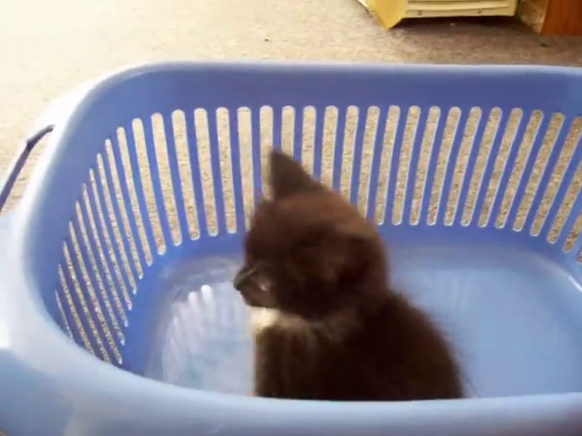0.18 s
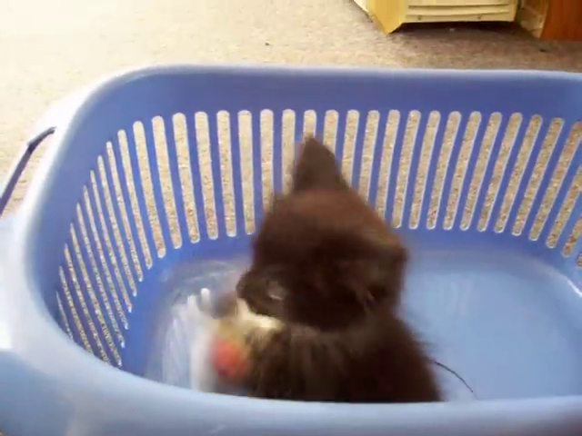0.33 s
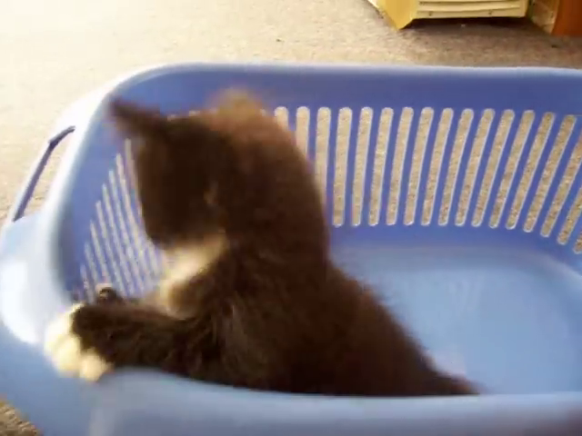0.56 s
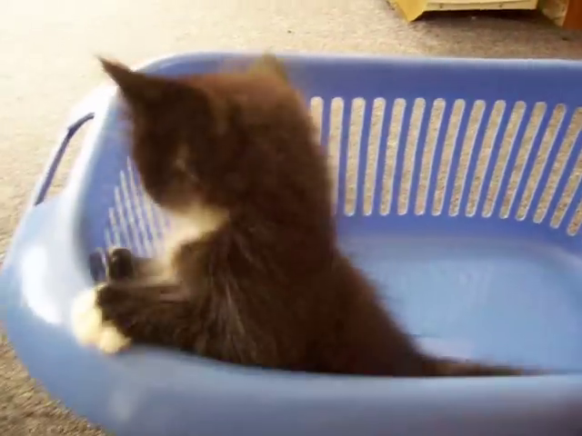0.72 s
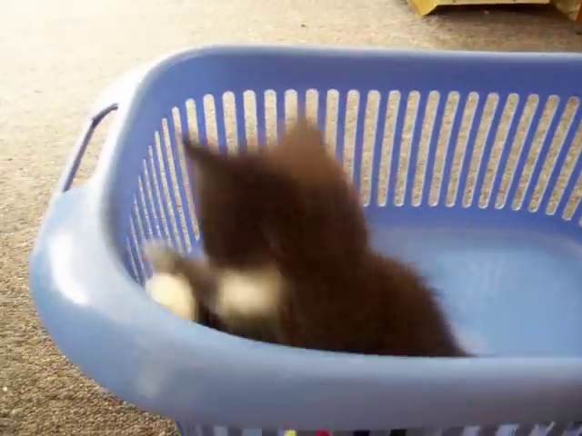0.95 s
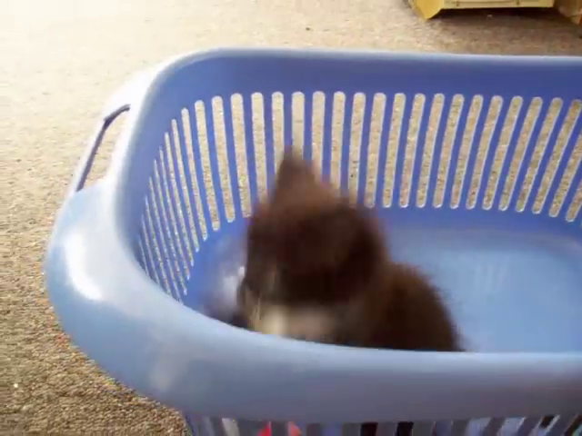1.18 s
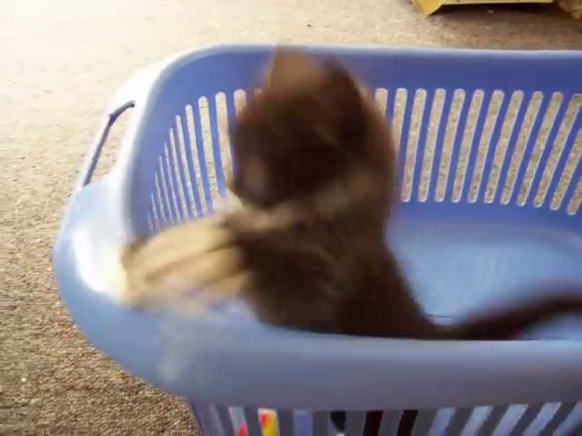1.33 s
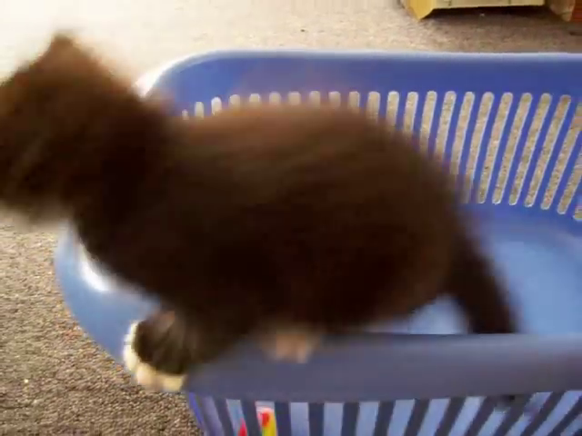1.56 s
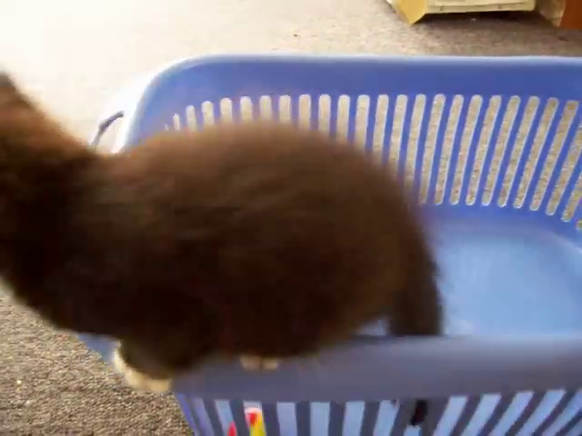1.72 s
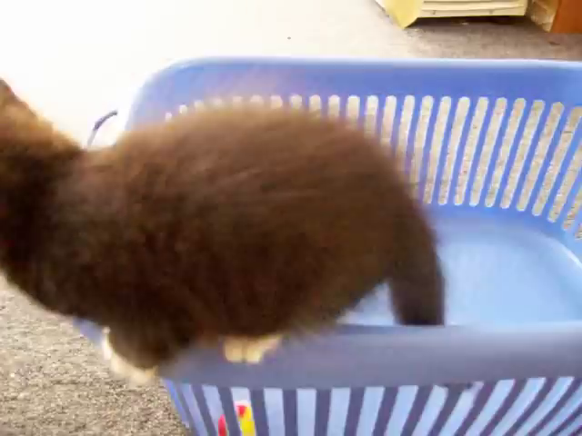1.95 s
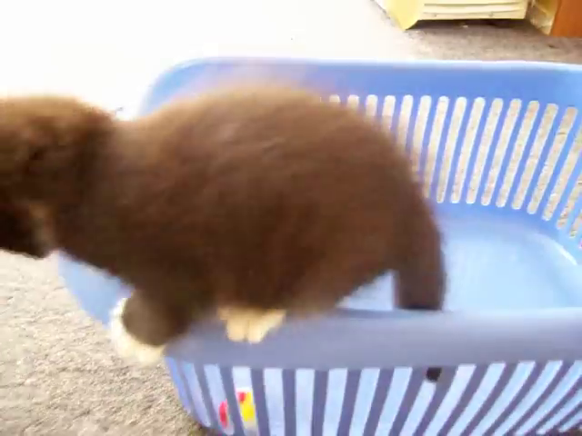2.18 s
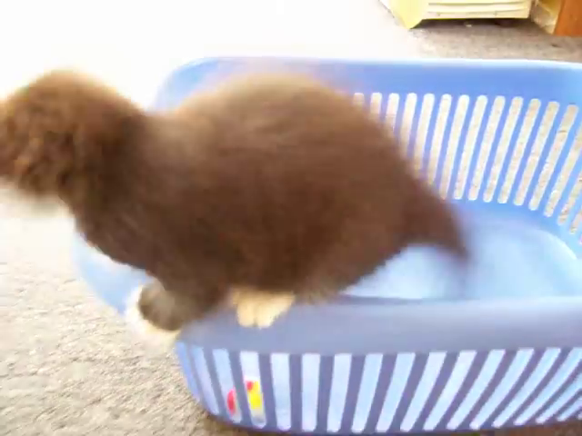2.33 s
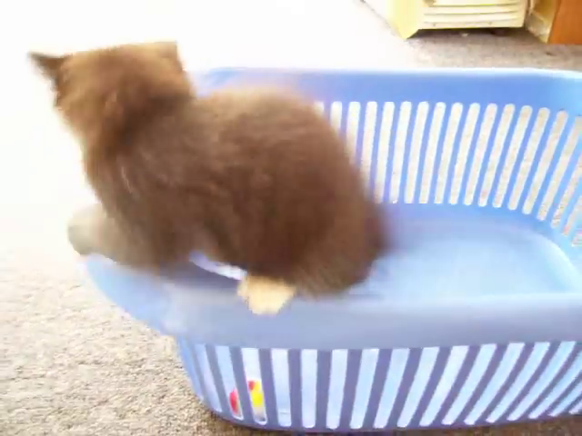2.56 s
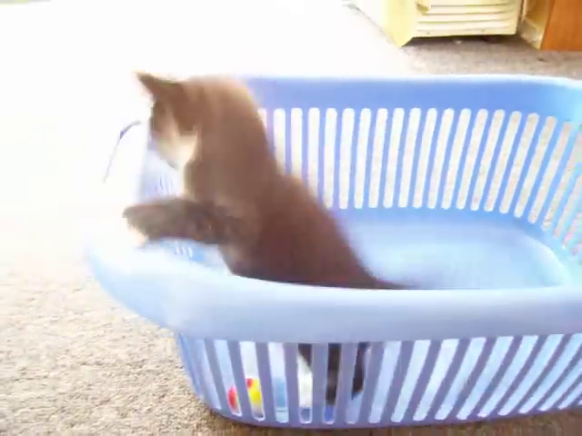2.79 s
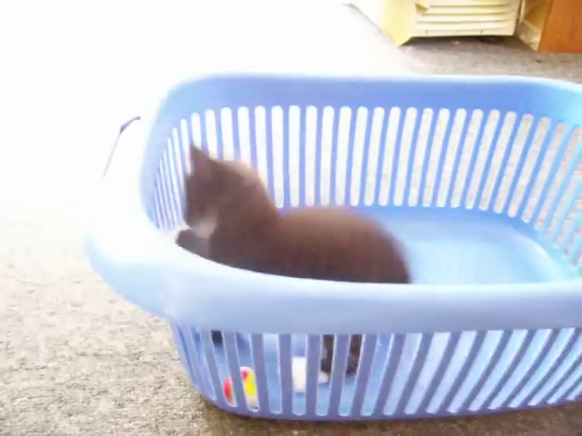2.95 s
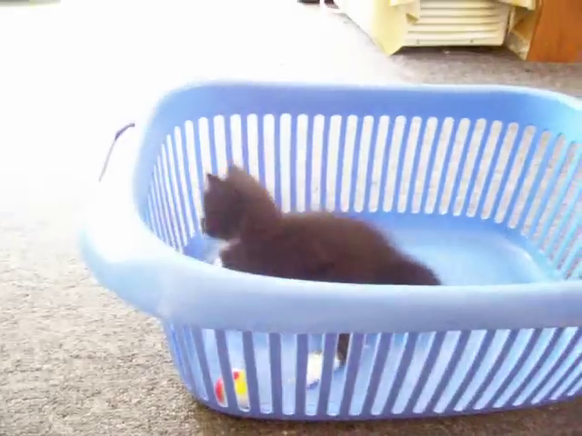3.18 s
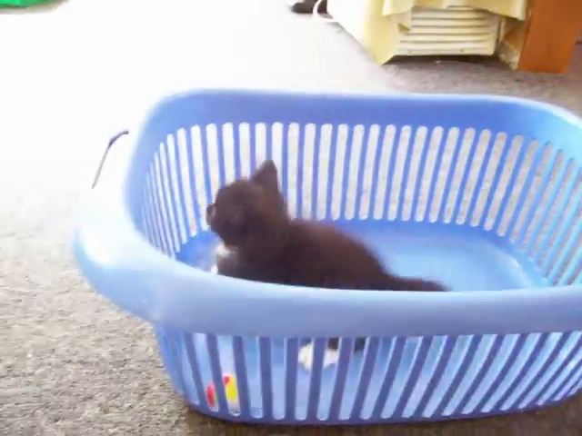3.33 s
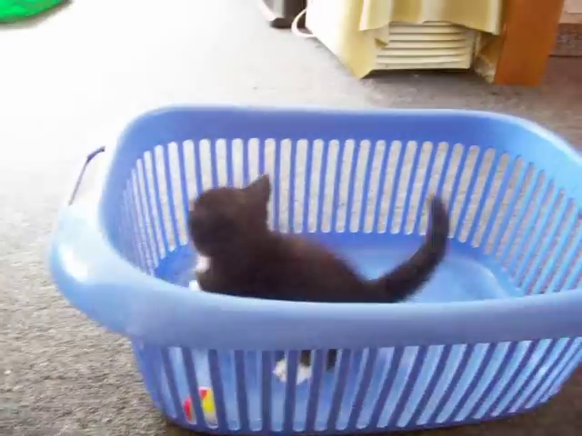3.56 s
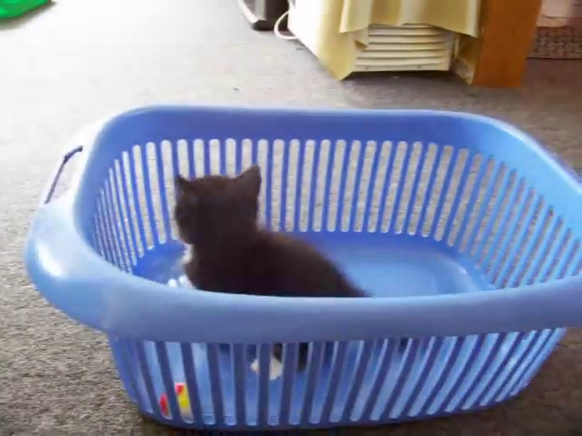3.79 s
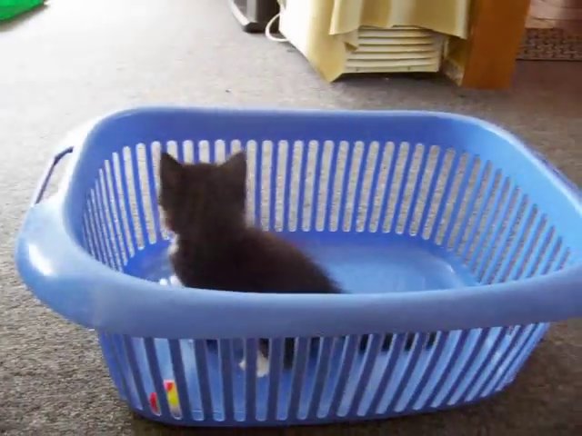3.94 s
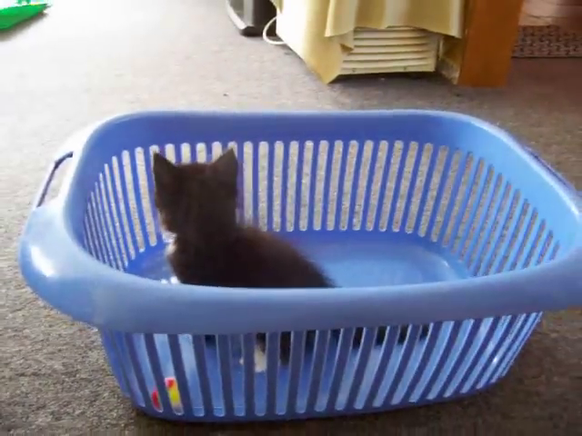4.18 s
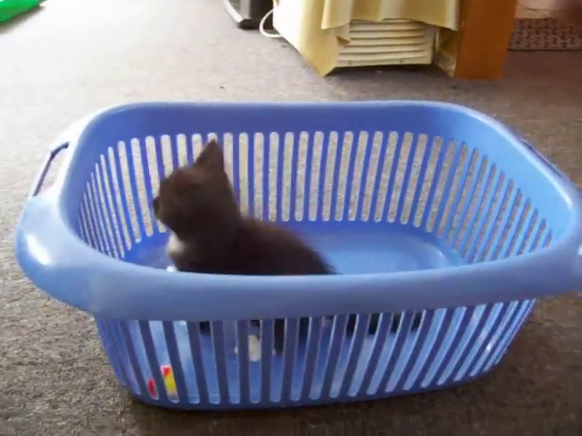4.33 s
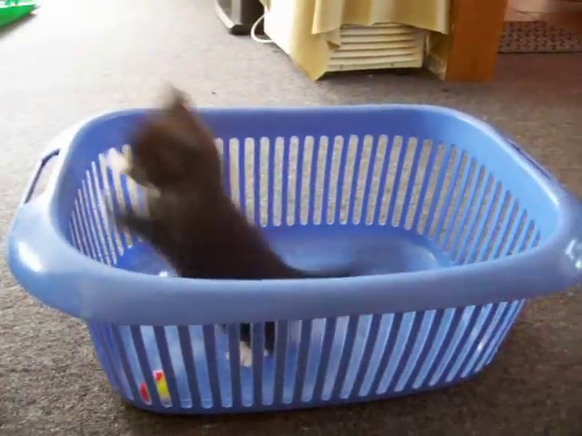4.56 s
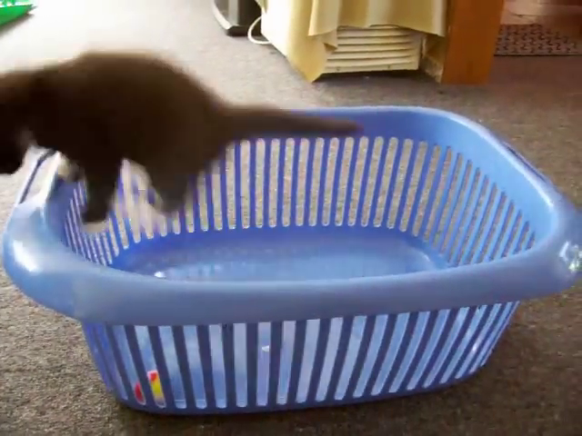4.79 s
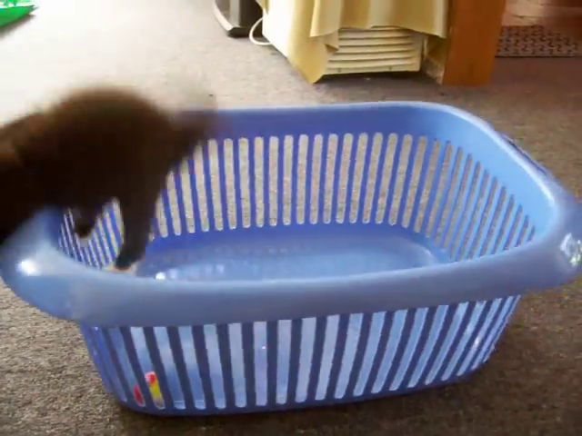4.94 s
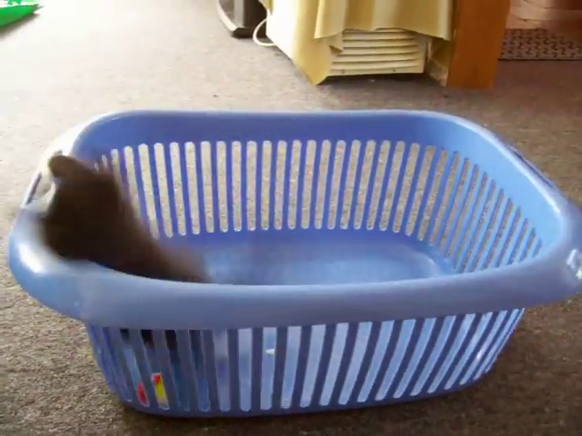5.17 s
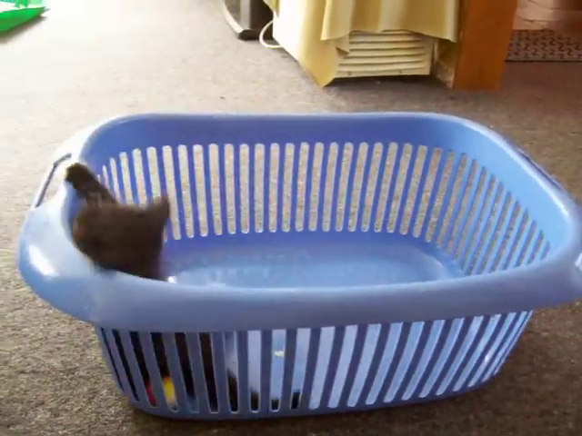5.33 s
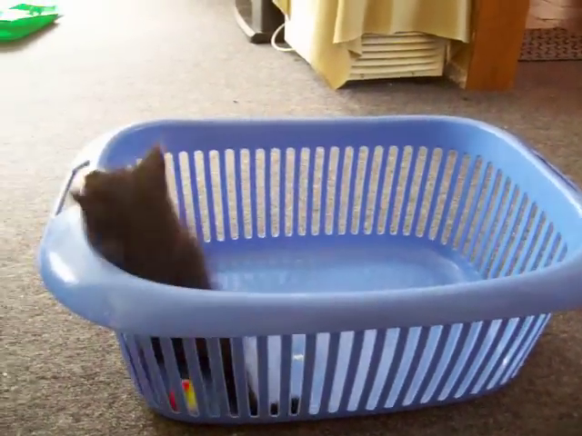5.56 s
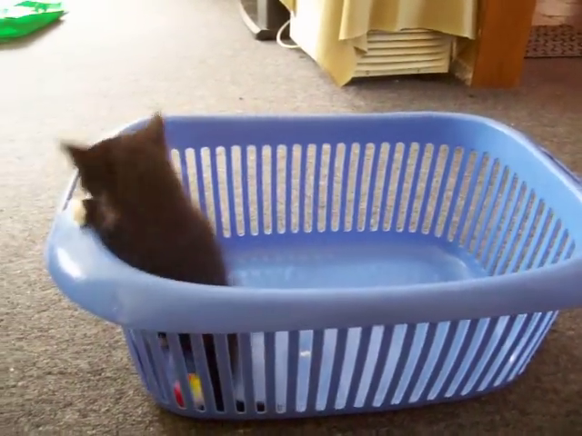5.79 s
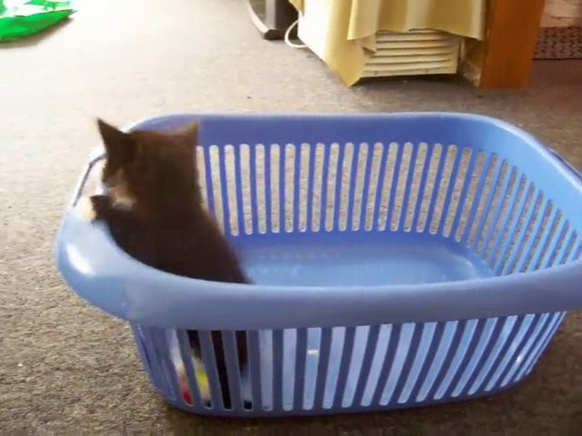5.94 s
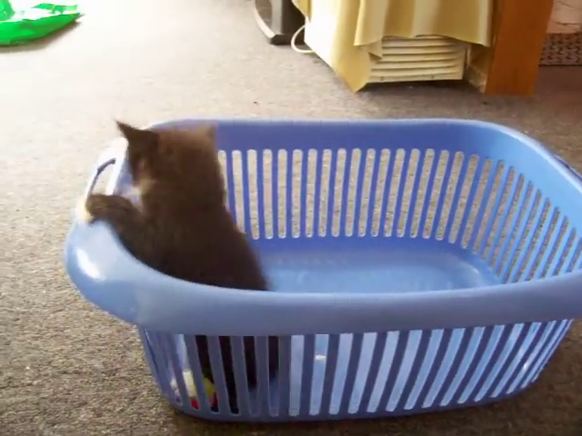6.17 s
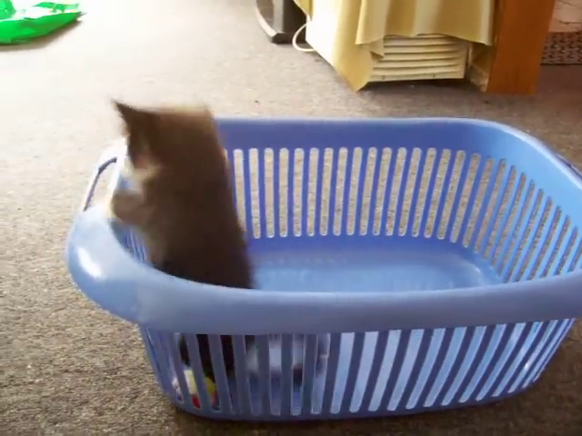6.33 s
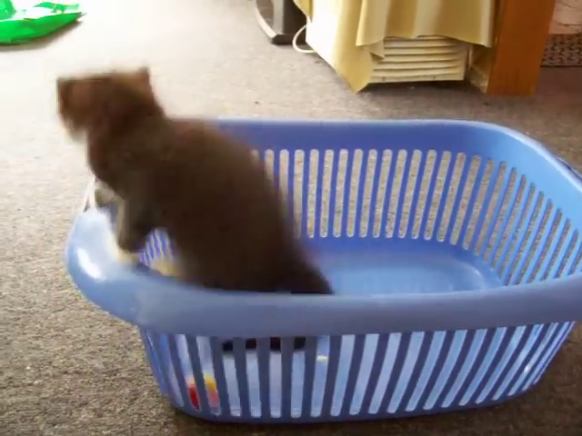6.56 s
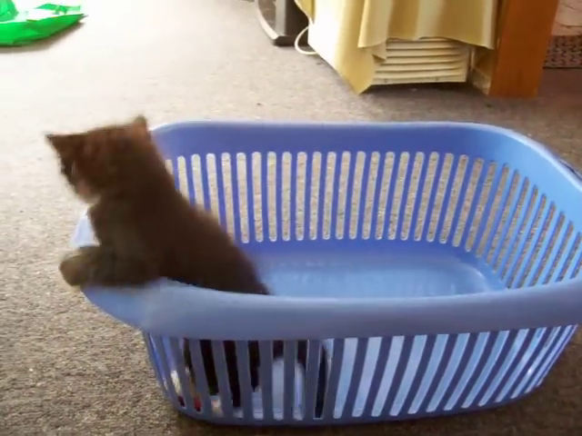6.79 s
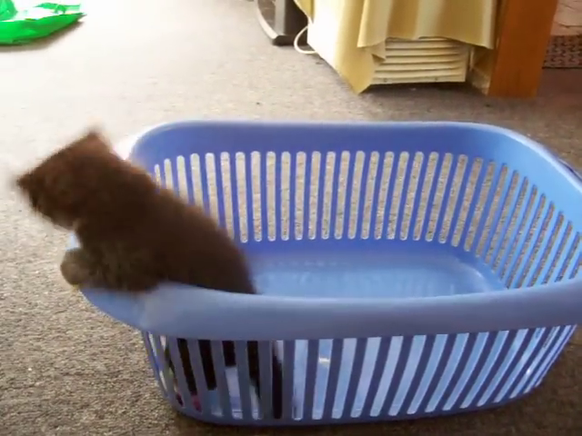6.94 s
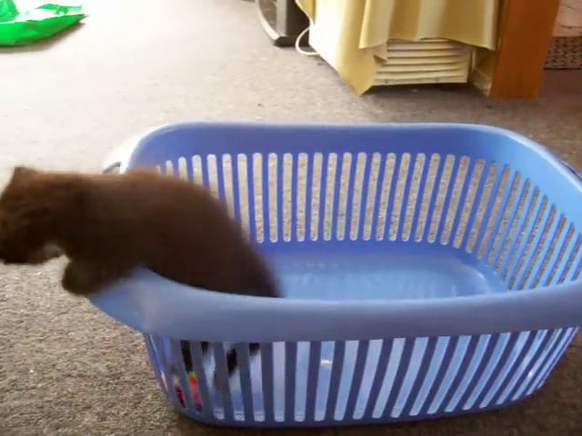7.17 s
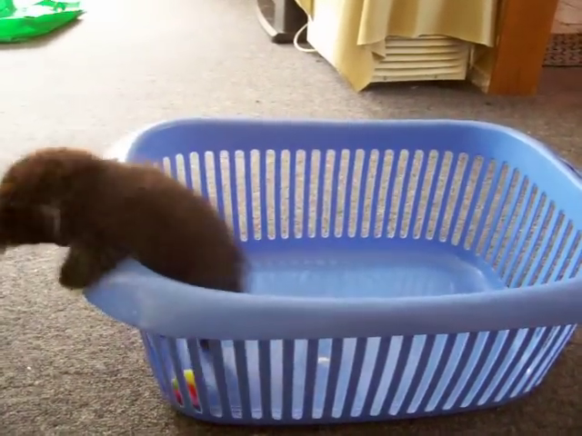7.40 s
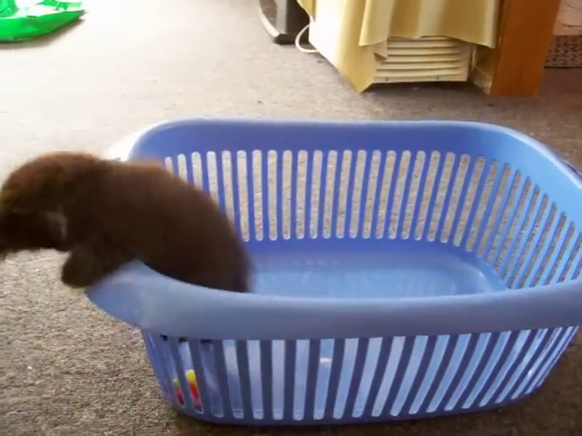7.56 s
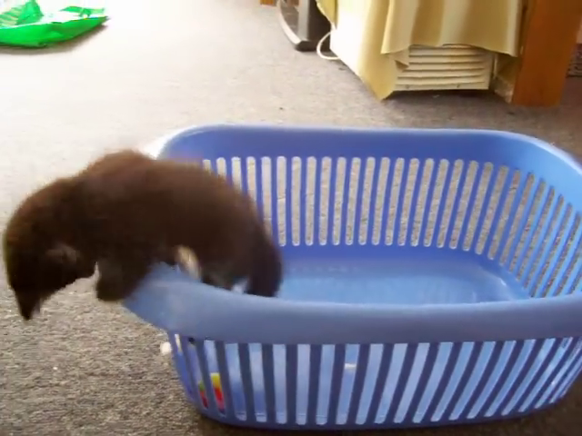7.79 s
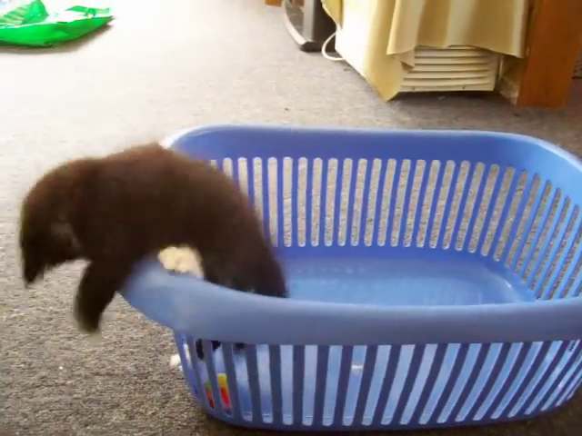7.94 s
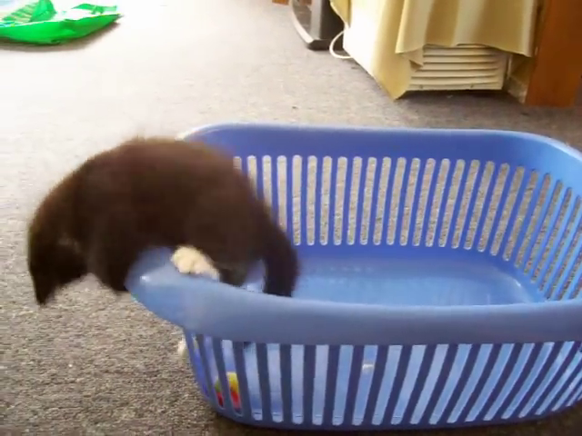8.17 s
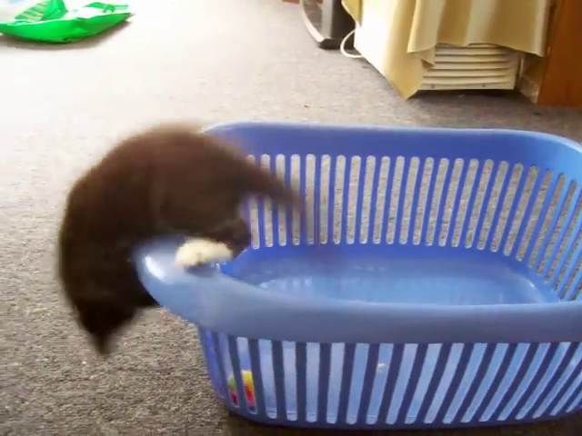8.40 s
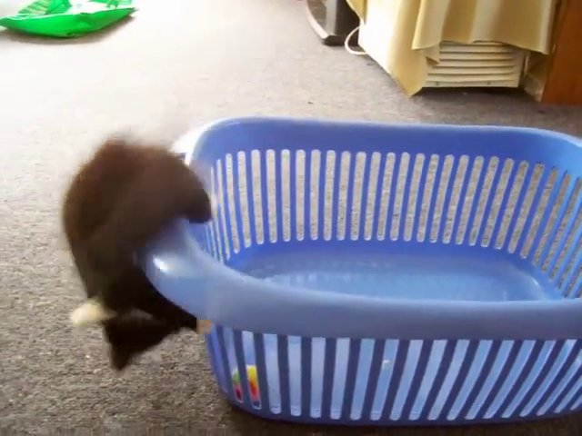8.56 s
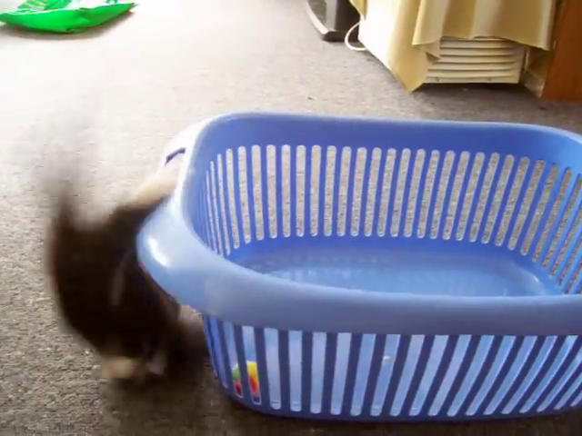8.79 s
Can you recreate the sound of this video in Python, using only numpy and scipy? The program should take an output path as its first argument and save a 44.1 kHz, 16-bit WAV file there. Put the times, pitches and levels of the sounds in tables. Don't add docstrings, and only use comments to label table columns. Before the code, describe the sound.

Small claws click, scrape and skid on a slatted plastic basket in bursts, with hollow thumps, over quiet room hum and thin camera whine.

```python
import sys
import numpy as np
from scipy import signal
from scipy.fft import rfft, irfft, next_fast_len
from scipy.io import wavfile
from scipy.ndimage import uniform_filter1d, map_coordinates

SR = 44100
rng = np.random.default_rng(int(sys.argv[2]) if len(sys.argv) > 2 else 0)


def undo_db(level):
    steps = np.asarray(level, float) / 20
    return 10 ** steps


def waveform_to_disk(signal):
    frames = np.transpose(np.atleast_2d(signal))
    scaled = np.clip(frames, -1, 1) * 32767
    samples = np.round(scaled).astype(np.int16)
    wavfile.write(sys.argv[1], SR, samples)


N = 388962

# (time [s], claw pull [dB], weight on the basket [dB])
DRAG_BOUTS = [
    [(0.0, -46.5, -41), (0.29, -65, -49.5), (1.02, -59, -45), (1.12, -44.5, -47), (1.4, -65.5, -45),
     (1.62, -48.5, -40.5), (2.1, -70, -57.5)],
    [(2.6, -61, -49.5), (2.69, -60, -46), (2.73, -45, -42), (2.95, -45, -41), (3.05, -56, -44),
     (3.16, -49, -44), (3.3, -62, -54)],
    [(4.7, -66, -48), (4.9, -56, -44), (5.214, -43, -34), (5.295, -56, -40), (5.36, -46, -40),
     (5.52, -57, -48), (5.7, -74, -55)],
    [(6.05, -57.5, -50), (6.53, -52.5, -49), (6.61, -44.5, -57), (7.01, -56.5, -45.5), (7.52, -45, -43),
     (8.1, -59.5, -47.5), (8.38, -51, -53), (8.7, -41, -42), (8.82, -47, -22)],
]
# (frequency [Hz], width [Hz], level [dB])
SLAT_MODES = [(2000, 680, -1.5), (2500, 1200, 1.5), (2970, 575, -2), (3180, 470, -13), (1660, 590, -18.5)]
# (frequency [Hz], width [Hz], level [dB])
EDGE_MODES = [(3980, 1600, -1), (5364, 1640, 5.5), (5760, 1780, 7), (7270, 1620, -0.5), (8460, 1300, 0)]
# (frequency [Hz], width [Hz], level [dB])
BELLY_MODES = [(156.4, 57, -8.5), (220, 37, -4.5), (278.7, 22, -1.5), (357.4, 24, -2.5), (484, 122, -6.5)]
# (frequency [Hz], width [Hz], level [dB])
WALL_MODES = [(620, 86, -2), (835, 122, -2.5), (889, 93, -1), (1094, 96, -8.5)]
# (frequency [Hz], density [dB per Hz])
AIR_SPECTRUM = [(15, -47), (30, -10), (50, 2.5), (100, -5), (125, -8), (460, -5.5), (900, -9),
                (1500, -22.5), (2750, -22), (2950, -26.5), (5100, -26.5), (5700, -18), (7200, -16.5),
                (9000, -9)]
# (frequency [Hz], rms level [dB])
DRONE = [(64.6, -57.5), (91.5, -51), (333.8, -61), (463.0, -55.5), (620, -59.5), (678.3, -58.5),
         (925.9, -56.5)]
# (sideband order [-], rms level [dB])
SCAN_SIDEBANDS = [(2, -68), (1, -60), (0, -59), (-1, -65), (-3, -68), (-5, -68), (-7, -69), (-9, -69),
                  (-11, -70), (-14, -70), (-16, -71), (-18, -71)]
# (frequency [Hz], t60 [s])
ROOM_T60 = [(150, 0.31), (1000, 0.4), (2500, 0.18), (4000, 0.21), (8000, 0.21)]
# (frequency [Hz], gain [dB])
MIC_RESPONSE = [(20, -26), (100, -1), (1050, 0), (1400, -6.5), (1800, -0.5)]
# (frequency [Hz], gain [dB])
CONVERTER_RESPONSE = [(7350, 0), (7700, -8), (8000, -12), (8450, -18), (8900, -34), (9150, -60),
                      (11000, -80)]

# (time [s], slat level [dB], ring [Hz], bright edge [dB])
STROKES = [(0.55, -48, 1970, -5), (1.76, -28.5, 2520, -10), (2.735, -30.5, 2300, -6),
           (2.797, -31.5, 4400, -1), (4.937, -31.5, 5740, -1), (5.3421, -24.5, 2080, -20),
           (6.657, -31.5, 2500, 2), (7.556, -34, 2510, 1.5), (7.87, -38.5, 2320, -3),
           (8.408, -35.5, 2660, 3), (3.195, -41, 2250, -10), (7.42, -37, 2300, 5)]
# (time [s], slat level [dB], ring [Hz], bright edge [dB])
SNAPS = [(1.2504, -38, 2920, -14), (0.657, -40, 7800, 8), (7.0445, -40, 4600, 4), (7.103, -41, 7400, 9),
         (7.321, -43, 7300, 9), (9.4, -38, 5800, 1), (6.7495, -39, 5600, 7), (8.2338, -43, 2370, -6),
         (3.598, -44, 2300, -3), (1.9634, -40, 2760, -2), (4.909, -42, 6330, 20),
         (4.9954, -26.5, 2250, -10), (5.0989, -14, 2280, -10), (5.1374, -21, 2500, -10),
         (5.331, -22, 2170, -18), (5.3, -27, 2950, -2)]
# (time [s], slat level [dB], ring [Hz], bright edge [dB])
TAPS = [(0.001, -32, 2150, 1), (0.675, -34, 6800, 6), (1.0146, -27, 2830, -2.5), (1.0383, -18, 2100, -4.5),
        (1.4975, -23, 2900, 5), (1.976, -35, 2480, 4.5), (2.651, -40, 2360, -10), (2.857, -23.5, 5650, 5.5),
        (2.9196, -21.5, 2370, -1.5), (2.9634, -32.5, 5550, 14), (2.9923, -26.5, 2600, 2.5),
        (0.129, -19.5, 2130, -21), (5.0492, -15.5, 2180, -27), (5.109, -21.5, 5640, 2),
        (5.1605, -14.5, 2650, -12), (5.1795, -26, 2080, -12), (5.2342, -34, 6760, 11),
        (5.281, -30, 2420, -9), (5.318, -19, 2360, -8.5), (5.6382, -39, 2730, 1),
        (6.7597, -19.5, 2300, -17), (6.907, -30, 2420, -6), (6.9164, -28, 2550, -10),
        (7.2858, -24, 2600, 4), (0.538, -14, 2000, -14), (7.616, -30.5, 2630, -14),
        (8.1545, -31.5, 2440, -10), (8.2735, -24.5, 2500, 0), (8.526, -24, 2350, -8),
        (8.7694, -20, 2400, 0), (0.359, -45, 2260, -12), (0.4903, -45, 2270, -10), (0.9966, -40, 2880, -4),
        (1.2615, -39, 2510, -5), (1.7699, -33, 2400, -8), (6.8899, -48, 2600, -8), (7.925, -39, 2080, -8),
        (3.66, -45, 2300, -10)]
# (time [s], slat level [dB], ring [Hz], bright edge [dB])
CATCHES = [(0.4116, -28.5, 2180, -15), (0.547, -28, 2100, -11), (0.62, -34, 2480, -5),
           (0.648, -23, 2050, -18), (0.661, -16, 2130, -10), (0.733, -37.5, 2410, -1),
           (0.766, -29.5, 2850, -10), (0.7902, -31.5, 1870, -2), (1.178, -18.5, 2130, -5.5),
           (1.3742, -26.5, 2130, -8), (1.7775, -23.5, 2500, -16), (2.714, -31, 2300, -4),
           (2.783, -32.5, 7460, 8), (2.9523, -36, 6500, 15), (3.013, -31.5, 2300, -7),
           (5.035, -31, 2590, -4), (6.556, -26, 2500, -12), (3.1638, -28.5, 2100, -6),
           (4.8697, -34.5, 2470, -3), (4.8985, -35, 2460, -4), (6.1843, -33.5, 2770, -10),
           (6.5966, -23.5, 2760, -14), (6.767, -22, 2670, -5), (7.09, -31, 2540, 2),
           (7.1605, -24, 2630, -14), (7.4055, -26.5, 2390, 1), (7.8397, -39, 1900, 2),
           (7.991, -35.5, 2400, -8), (8.5966, -22.5, 2480, -9), (8.7252, -28, 3650, 4.5)]
# (time [s], slat level [dB], ring [Hz], bright edge [dB])
RAKES = [(0.1647, -34, 2270, -4), (.398, -42, 2200, -13), (0.75, -31, 2780, -5), (0.9556, -37.5, 3960, 4.5),
         (1.619, -36.5, 5940, 2), (1.716, -37.5, 2350, -3), (2.759, -29, 2500, -9), (4.9674, -28, 2170, -1),
         (5.119, -25, 2430, -2.5), (5.4534, -30, 2080, -9), (6.1312, -31.5, 2220, 0.5),
         (6.407, -31.5, 7000, 9.5), (6.414, -23.5, 2890, -4), (6.5745, -29.5, 5800, 1),
         (6.7055, -23.5, 6100, 1.5), (7.0432, -37, 5760, 3), (7.067, -33.5, 2430, 0.5),
         (7.355, -27.5, 2600, -8), (7.6, -37, 2350, -1), (7.709, -39, 2570, 7), (8.546, -26, 2720, -6.5),
         (8.577, -36, 4890, 6.5), (8.757, -22.5, 2920, -6), (1.152, -36, 2450, -4), (1.171, -36, 2400, -3),
         (4.945, -34, 5200, 4), (2.72, -35, 4600, 5), (5.322, -31.5, 5000, 5), (5.185, -37, 6000, 4),
         (1.424, -42.5, 6820, 7), (7.44, -39, 2300, 1), (7.978, -41, 2400, -8)]
# (time [s], slat level [dB], ring [Hz], bright edge [dB])
CRACKS = [(0.3328, -23.5, 6600, 11), (0.3342, -27, 3650, 11), (0.3355, -26, 2600, 0),
          (6.5524, -13, 2630, 1.5), (2.8555, -19, 2500, -1), (7.786, -38.5, 2900, 5.5), (1.7, -42, 2500, 1),
          (7.406, -28, 2300, 5), (4.9365, -22, 2400, 4), (6.768, -30, 3700, 6), (7.5588, -38, 5800, 6)]
# (time [s], slat level [dB], ring [Hz], bright edge [dB])
GRINDS = [(0.5375, -12.5, 1990, -15), (2.7065, -22.5, 2400, 3), (2.7875, -21.5, 2330, 2.5),
          (1.498, -21, 2450, 2), (1.379, -36, 2900, 0), (3.091, -14.5, 2400, -7), (3.1275, -25, 3820, 2),
          (3.1425, -20, 2170, -1.5), (4.9298, -18, 2400, 2.5), (5.3095, -13.5, 2410, 0.5),
          (6.415, -26.5, 4040, 8.5), (7.1605, -28.5, 5100, 1.5), (8.6985, -18.5, 2400, -6)]
# (events, build-up [s], hold [s], t60 [s])
CLAW_KINDS = [(SNAPS, .0025, 0, 0.016), (TAPS, .0023, 0, 0.028), (CATCHES, .0023, 0, 0.05),
              (RAKES, .006, 0, 0.063), (STROKES, 0.0091, 0, 0.19), (CRACKS, .0014, 0, 0.0084),
              (GRINDS, .0015, 0.005, 0.018)]

# (time [s], belly level [dB], ring [Hz], upper wall [dB])
PATS = [(0.942, -27.5, 234, -7), (1.2919, -45, 656, 6.5), (2.8098, -18.5, 220, -28.5),
        (2.9416, -37, 765, 4.5), (3.009, -28.5, 775, 3.5), (3.09, -29, 1460, 7.5),
        (3.8079, -32.5, 486, -21), (4.5087, -37, 150, -3), (5.0238, -36, 182, -9), (5.0968, -40, 330, 1),
        (5.2865, -31, 394, -12), (5.309, -20, 877, 2.5), (5.332, -11, 284, -8.5), (5.4083, -29.5, 330, -20),
        (6.757, -33, 1390, 5), (8.8125, -16, 271, -0.5)]
# (time [s], belly level [dB], ring [Hz], upper wall [dB])
KNOCKS = [(0.6121, -26, 236, -11), (1.0386, -30.5, 578, -1.5), (1.2266, -40.5, 620, 7.5),
          (1.4954, -22.5, 372, -5.5), (2.7111, -32.5, 640, 1), (2.9175, -25, 266, -9.5),
          (2.9908, -30.5, 284, -3), (3.084, -19, 158, -15), (3.0882, -18, 389, -0.5), (3.1399, -29, 820, 1),
          (4.9366, -27.5, 382, -1), (5.2627, -37.5, 297, -4), (4.98, -22.5, 164, -11.5),
          (5.467, -44, 684, 4), (6.712, -35.5, 980, 2.5), (8.7263, -39.5, 810, 7), (8.779, -38.5, 800, 4),
          (3.86, -41, 470, -12)]
# (time [s], belly level [dB], ring [Hz], upper wall [dB])
BUMPS = [
    (0.408, -40, 620, 6),
    (0.54, -30.5, 632, 8.5),
    (5.047, -33, 179, 1.5),
    (5.1567, -26, 970, 1),
    (5.2302, -33, 590, 2.5),
]
# (time [s], belly level [dB], ring [Hz], upper wall [dB])
SHOVES = [
    (0.6482, -29, 367, -0.5),
    (1.1741, -42.5, 700, 4.5),
    (4.968, -18.5, 275, -11),
    (5.337, -16, 270, -8),
    (5.335, -24, 185, -20),
    (6.645, -31, 230, -14),
    (6.75, -31.5, 898, 4.5),
    (8.2703, -34, 232, -2.5),
    (8.76, -33.5, 900, 6.5),
]
# (time [s], belly level [dB], ring [Hz], upper wall [dB])
JOLTS = [(0.3335, -38.5, 810, 16.5), (0.334, -39.5, 1260, 16), (5.3305, -6.5, 280, -3),
         (0.538, -38, 1300, 16), (1.039, -45.5, 1300, 13), (1.498, -48, 1300, 16), (5.16, -38.5, 1400, 9),
         (5.344, -20, 300, -3), (5.3665, -20.5, 322, -1), (2.788, -42, 1350, 14), (3.111, -27, 330, -1)]
# (events, build-up [s], t60 [s])
BODY_KINDS = [(PATS, 0.00369, 0.042), (KNOCKS, .0033, 0.1), (BUMPS, 0.01117, 0.053), (SHOVES, 0.02, 0.16),
              (JOLTS, 0.00197, 0.016)]

AIR_DB = -41.5
SCAN_HZ, FRAME_HZ, FOLD_HZ = 7852.3, 29.97, 16000.3
FIRST_FRAME_S = 0.011
RASP_DB = 1
EDGE_LASTS = 0.91
MID_SLAT_HZ = 2400


def unit(x):
    return x / np.sqrt(np.mean(x ** 2) + 1e-20)


def peak(x):
    return x / np.sqrt(uniform_filter1d(x ** 2, size=110).max())


def along(points, hz):
    f, v = np.transpose(points)
    return np.interp(np.log(hz + 1), np.log(f + 1), v)


def filtered(x, response):
    m = next_fast_len(x.shape[-1] + 4096)
    spectrum = rfft(x, m) * response(np.fft.rfftfreq(m, 1 / SR))
    return irfft(spectrum, m)[..., :x.shape[-1]]


def resonate(x, modes, stretch=1, damp=1):
    def response(f):
        total = 0
        for k, (hz, width, db) in enumerate(modes):
            center, loss = hz * stretch, 1j * f * width * damp
            total = total + (-1) ** k * undo_db(db) * loss / (center * center - f * f + loss)
        return total
    return filtered(x, response)


def wobble(rate):
    knots = rng.standard_normal(int(N * rate / SR) + 4)
    return map_coordinates(knots, [np.arange(N) * rate / SR])


def slips(size, spike_db):
    return unit(rng.standard_normal(size) * undo_db(spike_db * rng.exponential(size=size)))


def stroke(t, rise, t60, hold=0):
    rise, t60 = max(rise, 1e-4), max(t60, 0.004)
    build_db = -9 * (1 - t / rise)
    decay_db = -60 * np.maximum(t - rise - hold, 0) / t60
    return undo_db(np.where(t < rise, build_db, decay_db))


def contacts(kinds):
    return [(*row, *timing) for rows, *timing in kinds for row in rows]


def background():
    t = np.arange(N) / SR
    air = unit(filtered(rng.standard_normal(N), lambda f: undo_db(along(AIR_SPECTRUM, f)) * (f < 9500)))
    air *= undo_db(AIR_DB - 1.0 + 0.4 * wobble(2.97))
    circuit = unit(resonate(rng.standard_normal(N), [(5970, 1600, 0)]))
    out = air + undo_db(-59 + 3.2 * wobble(1.4)) * circuit
    for hz, db in DRONE:
        out += undo_db(db + 4.5 * wobble(21)) * np.sin(2 * np.pi * hz * t + 1.2 * wobble(9))
    return out


def whine():
    t, out = np.arange(N) / SR - FIRST_FRAME_S, np.zeros(N)
    for order, db in SCAN_SIDEBANDS:
        hz = SCAN_HZ + order * FRAME_HZ
        fold_db = -4 - 0.035 * max(SCAN_HZ - hz, 0)
        tone = np.cos(2 * np.pi * hz * t)
        folded = np.cos(2 * np.pi * (FOLD_HZ - hz) * t)
        sign = -1 if order > 0 else 1
        out += sign * undo_db(db) * np.sqrt(2) * (tone + undo_db(fold_db) * folded)
    return out


def room(x):
    out, hop = np.zeros(N + SR), SR // 4
    for start in range(0, N, hop):
        hz, t, z = signal.stft(rng.standard_normal(SR // 2), SR, nperseg=256)
        decay = undo_db(-60 * t / along(ROOM_T60, hz)[:, None])
        tail = signal.istft(z * decay, SR, nperseg=256)[1]
        wet = signal.fftconvolve(x[start:start + hop], tail / np.linalg.norm(tail))
        out[start + 200:][:len(wet)] += wet
    return out[:N]


def drag():
    out, t = np.zeros(N), np.arange(N) / SR
    grip = undo_db(3.1 * wobble(45) + 1.6 * wobble(160))
    scrape = unit(resonate(grip * slips(N, spike_db=2), SLAT_MODES))
    rasp = unit(sum(resonate(grip * slips(N, spike_db=3.0), EDGE_MODES, stretch) for stretch in (0.84, 1.05)))
    load = undo_db(5.2 * wobble(30)) * slips(N, spike_db=2)
    rumble = unit(resonate(load, BELLY_MODES + WALL_MODES))
    for rows in DRAG_BOUTS:
        s, *cols = np.transpose(rows)
        pull_db, weight_db = [np.interp(t, s, c) for c in cols]
        moving = np.clip(np.minimum(t - s[0] + 0.014, s[-1] - t + 0.011) / 0.029, 0, 1)
        rubbing = undo_db(pull_db) * (scrape + undo_db(RASP_DB) * rasp)
        out += moving * (rubbing + undo_db(weight_db - 5.5) * rumble)
    return out


def thumps():
    out, t, jerks = np.zeros(N + SR), np.arange(SR // 3) / SR, slips(N + SR, spike_db=3.0)
    for s, db, hz, upper_db, rise, t60 in contacts(BODY_KINDS):
        at = round(s * SR)
        force = jerks[at:][:len(t)] * stroke(t, 0.54 * rise, 0.98 * t60)
        force = force[:round((rise + t60 + 0.08) * SR)]
        force[round(0.6 * rise * SR)] += 11 * min(1, 0.005 / rise)
        on_wall = hz > 525
        belly_spot = [] if on_wall else [(hz, 48, 11)]
        wall_spot = [(hz, 0.1 * hz, 5)] if on_wall else []
        belly = peak(resonate(force, belly_spot + BELLY_MODES))
        walls = peak(resonate(force, wall_spot + WALL_MODES, damp=max(1, 0.042 / t60)))
        out[at:][:len(force)] += undo_db(db - 1.5) * (belly + undo_db(upper_db) * walls)
    return out[:N]


def claws():
    out, jerks = np.zeros((2, N + SR)), slips(N + SR, spike_db=1.5)
    spot = rng.uniform(0.864, 1.106, N)
    for s, db, hz, edge_db, rise, hold, t60 in contacts(CLAW_KINDS):
        rise, at = max(rise - 0.001, 0), round(s * SR)
        t = np.arange(round((rise + hold + t60 + 0.03) * SR)) / SR
        envelopes = [stroke(t, rise, t60, hold), stroke(t, rise, EDGE_LASTS * t60, hold)]
        force = jerks[at:][:len(t)] * envelopes
        force[:, round(rise * SR)] += 5 * min(1, 0.031 / t60)
        on_edge = hz > 3350
        lean = 1 if on_edge else (hz / MID_SLAT_HZ) ** 0.54
        slat_spot = [] if on_edge else [(hz / lean, 330, 6)]
        edge_spot = [(hz, 500, 6)] if on_edge else []
        edge_stretch = 1 if on_edge else spot[round(s * 200)]
        slat = peak(resonate(force[0], slat_spot + SLAT_MODES, stretch=lean))
        edge = peak(resonate(force[1], edge_spot + EDGE_MODES, stretch=edge_stretch))
        spread = peak(resonate(force[0], SLAT_MODES, stretch=lean))
        reach = min(1, (t60 / 0.016) ** 3)
        both = ([slat, spread] + undo_db(edge_db) * edge) * [[1], [reach]]
        out[:, at:][:, :len(t)] += undo_db(db - 3.0) * both
    return out[:, :N]


def scene():
    catches, resounding = claws()
    body = thumps() + drag()
    near = catches + body + undo_db(-7.5) * room(resounding) + undo_db(-9.5) * room(body)
    heard = filtered(near, lambda f: undo_db(along(MIC_RESPONSE, f)))
    return (heard + background())[None]


def roll_off(x):
    return signal.sosfilt(signal.butter(12, 9170, fs=SR, output="sos"), x)


def record(dry):
    held = dry / (1 + np.abs(dry / 0.72) ** 6) ** (1 / 6)
    loudness = np.sqrt(np.abs(uniform_filter1d(held ** 2, size=300)))
    hiss = undo_db(-16.0) * loudness * rng.standard_normal(dry.shape)
    limited = filtered(held + hiss, lambda f: undo_db(along(CONVERTER_RESPONSE, f)))
    return roll_off(limited + whine())


dry = scene()
out = record(dry)
waveform_to_disk(out)
```